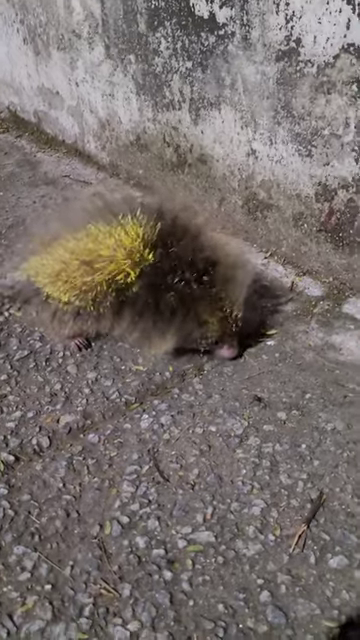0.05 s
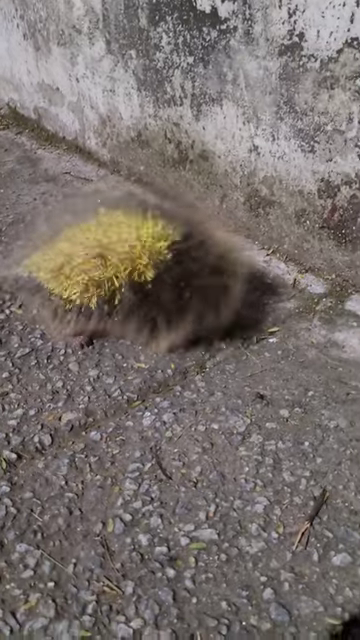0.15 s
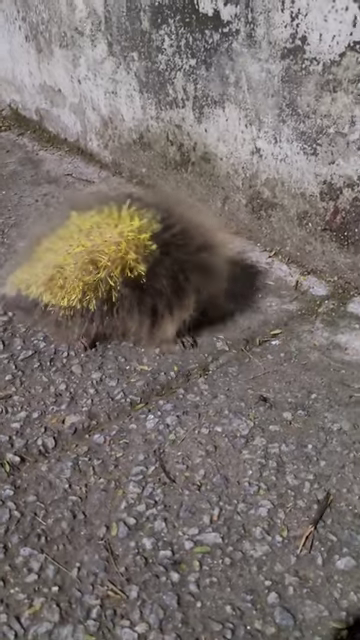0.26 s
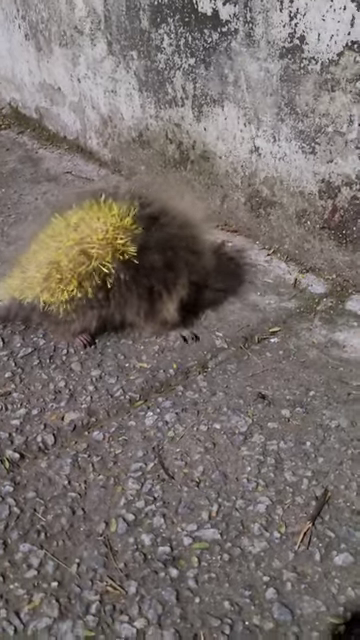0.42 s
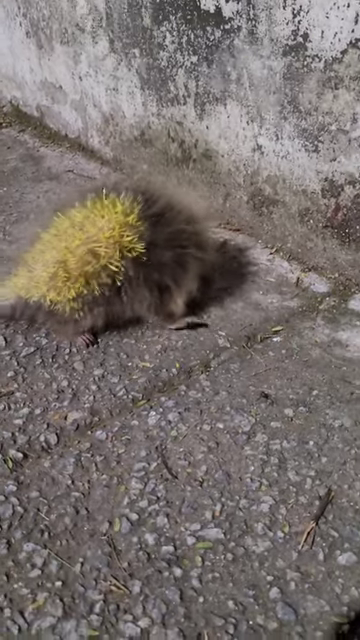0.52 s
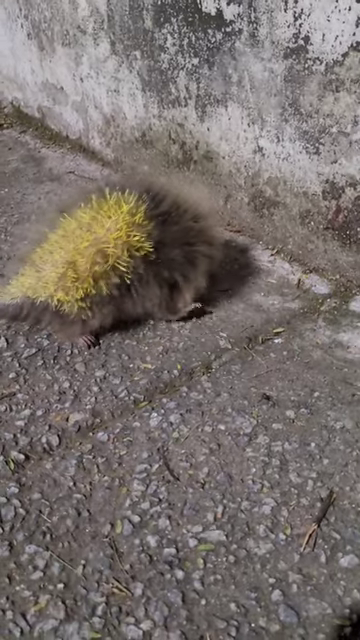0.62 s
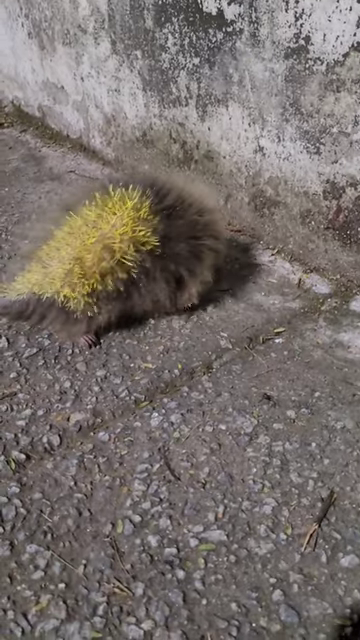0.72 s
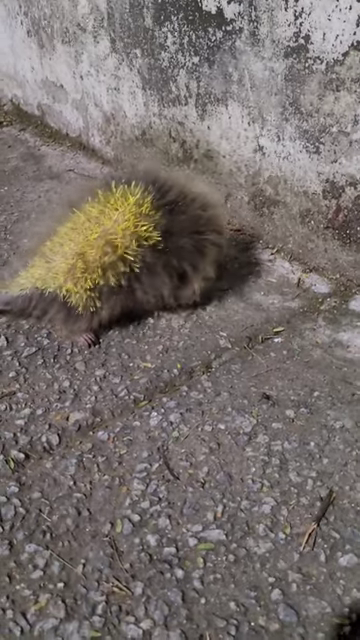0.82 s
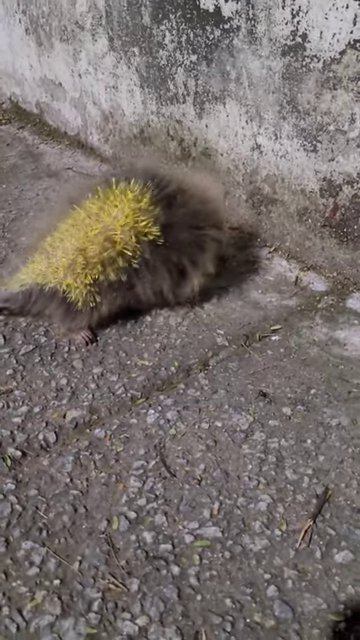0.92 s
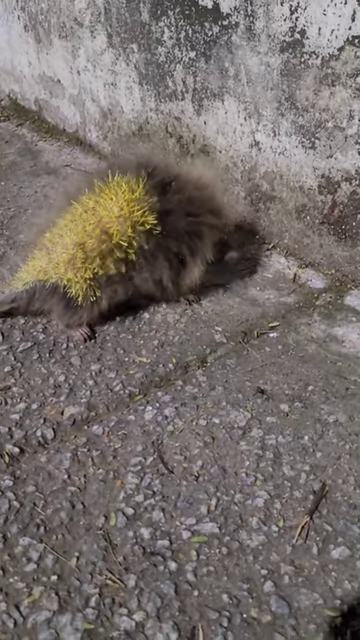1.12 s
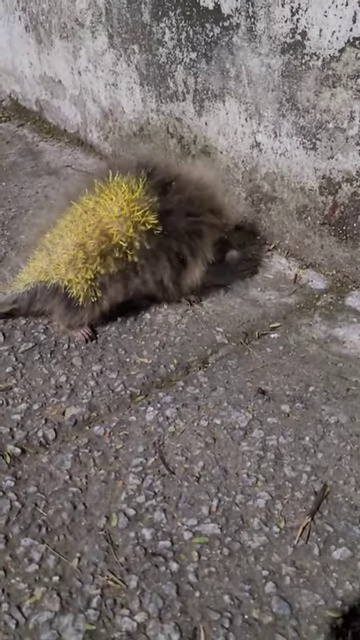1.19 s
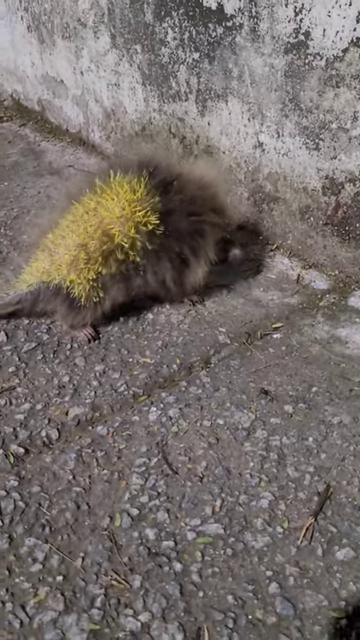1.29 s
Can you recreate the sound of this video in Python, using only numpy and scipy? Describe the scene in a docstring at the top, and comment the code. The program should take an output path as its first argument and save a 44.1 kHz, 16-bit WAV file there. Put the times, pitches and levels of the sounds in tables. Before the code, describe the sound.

Short, gritty scrape of a small porcupine's claws on pavement, over a faint low rumble.

```python
"""Soft brushing, then a loud scrape in two quick pushes: a small porcupine shuffles on gritty concrete.
Stick-slip friction of its claws makes the scrape, and grit snaps with sharp cracks that ring briefly.
The foot is close; a wall reflects its sound and the yard adds a short reverberation.
Light claw taps follow. Behind them are a far knock, a faint bird, the exhaust pulses of a distant
engine, a low hum and outdoor air."""
import sys
import numpy as np
from scipy import signal
from scipy.fft import rfft, irfft
from scipy.io import wavfile

SR = 44100
rng = np.random.default_rng(int(sys.argv[2]) if len(sys.argv) > 2 else 0)


def transcribe(signal):
    """Save signal, clipped to [-1, 1], as a 16-bit WAV file at the path in sys.argv[1]."""
    frames = np.atleast_2d(signal).T
    limited = np.clip(frames, -1, 1)
    pcm = np.round(limited * 32767).astype(np.int16)
    wavfile.write(sys.argv[1], SR, pcm)


N = 59535
TIME = np.arange(N) / SR


def amp(db):
    """Amplitude ratio of a level in decibels."""
    return 10 ** (np.asarray(db) / 20)

def unit(x):
    """Normalisation to unit rms."""
    return x / np.sqrt(np.mean(x ** 2) + 1e-20)

def read(points, hz):
    """Interpolation on a log-frequency axis."""
    f, value = np.transpose(points)
    return np.interp(np.log(hz + 1), np.log(f + 1), value)

def envelope(points):
    """Amplitude envelope, interpolated in decibels."""
    return amp(np.interp(TIME, *np.transpose(points)))

def fade(start, decay):
    """Exponential decay after an instant attack."""
    return (TIME >= start) * np.exp(-np.maximum(TIME - start, 0) / decay)

def lowpass(hz):
    """Second-order low-pass sections."""
    return signal.butter(2, hz, fs=SR, output="sos")

def colour(x, spectrum, size=4096):
    """Minimum-phase filtering at unit energy: only the shape of the spectrum counts."""
    log_gain = np.log(amp(read(spectrum, abs(np.fft.fftfreq(size, 1 / SR)))))
    taps = np.fft.ifft(np.exp(np.conj(signal.hilbert(log_gain)))).real[:size // 2]
    taps = np.reshape(taps / np.linalg.norm(taps), (1,) * (x.ndim - 1) + (-1,))
    return signal.fftconvolve(x, taps, axes=-1)[..., :N]

def reflect(x, response):
    """Convolution with an impulse response, normalised to unit energy on the left."""
    return signal.fftconvolve(x, response / np.linalg.norm(response[0]), axes=1)[:, :N]

def narrowband(hz, width):
    """Quadrature modulation gives two independent bands of noise."""
    a, b = signal.sosfilt(lowpass(width / 2), rng.standard_normal((2, 2, N)))
    return unit(a * np.cos(2 * np.pi * hz * TIME) + b * np.sin(2 * np.pi * hz * TIME))

def stereo(pair, coherence, left_lag_s=0):
    """Partial coherence: two independent signals mix into a left and a right channel."""
    hz = np.fft.rfftfreq(N, 1 / SR)
    shared = np.clip(read(coherence, hz), 0, 1)
    right, other = rfft(pair)
    left = (shared * right + np.sqrt(1 - shared ** 2) * other) * np.exp(-2j * np.pi * hz * left_lag_s)
    return irfft(np.array([left, right]), N)

# Left-right coherence of the close foot and of diffuse sound: f/Hz, coherence
CLOSE_COHERENCE = [(100,0.7),(600,0.93),(1500,1),(2200,.5),(2900,1),(3700,0.5),(5000,0.4),(15000,0)]
DIFFUSE_COHERENCE = [(40,0.75),(250,0.86),(600,0.76),(1300,0.31),(2500,0.071),(15000,.05)]

def close_source(pair):
    """A small delay: direct sound reaches the left channel slightly later."""
    return stereo(pair, CLOSE_COHERENCE, left_lag_s=0.00014)

def diffuse_noise():
    """A diffuse field of white noise, coherent mainly in the bass."""
    return stereo(rng.standard_normal((2, N)), DIFFUSE_COHERENCE)


# Strength of the two pushes: t/s, level/dB
PUSHES = [(.228,-75.5),(.235,-57.5),(.242,-41.5),(.246,-32.5),(.252,-37.5),(.256,-35),(.264,-32),(.271,-35),(.281,-28),(.286,-32),(.291,-26.5),(.300,-31),(.308,-41.5),(.317,-37),(.323,-27.5),(.330,-30.5),(.340,-46.5),(.354,-60.5)]
# Friction spectrum on each side: f/Hz, level/dB
FRICTION_LEFT = [(100,-26.5),(250,-15.5),(340,-6.5),(450,-2.5),(650,-14.5),(950,-9),(1380,0),(1750,-4),(2200,2.5),(2700,-1),(3300,1),(4400,2),(5500,-2),(6800,-1.5),(7700,1.5),(9000,-6),(10500,0),(13000,-2.5),(15500,-7.5)]
FRICTION_RIGHT = [(100,-31),(250,-12),(340,-3.5),(450,-2),(650,-12),(950,-9),(1380,2),(1750,-1.5),(2200,4.5),(2700,-1.5),(3300,-2.5),(4400,3),(5000,0),(6000,3.5),(6800,-2.5),(7900,2),(9000,0.5),(12500,3),(15500,-4.5)]

def scrape(grains_per_s=4000, grain_spread_db=3.5, smooth_share=0.55, thinning_db_per_s=75):
    """Stick-slip friction: claws drag over grit in dense micro-slips, and the low part thins."""
    struck = rng.random(N) < grains_per_s / SR
    grains = struck * amp(grain_spread_db * np.minimum(rng.exponential(1, N), 3))
    slips = np.sqrt(smooth_share + (1 - smooth_share) * unit(grains) ** 2)
    force = amp(np.interp(TIME, *np.transpose(PUSHES), left=-np.inf, right=-np.inf) - 1)
    friction = rng.standard_normal((2, N))
    bursts, cracks = grit_snaps()
    drive = close_source(friction * np.hypot(force * slips, bursts) + cracks)
    drive = drive + wall_reflection(drive)
    low = signal.sosfiltfilt(lowpass(3950), drive)
    low_db = np.clip(thinning_db_per_s * (0.31 - TIME), -4, 5)
    drive = drive + low * (amp(low_db) - 1)
    left = amp(-1) * colour(drive[0], FRICTION_LEFT)
    right = amp(1.45) * colour(drive[1], FRICTION_RIGHT)
    return np.array([left, right]) + force * grip_resonances()

# Grit snapping under the claws: t/s, level/dB, decay/s, ring f/Hz
GRIT_SNAPS = [(0.244,-33.5,.0015,1676),(0.2504,-30.5,0.0015,1705),(0.259,-30,0.00091,2270),(0.2645,-30,0.0011,1500),(0.2741,-25.5,0.00081,2180),(0.2763,-30,0.00078,2110),(0.2801,-24,0.00088,2304),(.2875,-27.5,.0011,4863),(0.2924,-25.5,0.00082,5990),(0.2979,-18.5,.0009,10340),(0.2993,-23.5,.0007,1953),(0.3202,-25,.0008,7740),(0.3219,-27,.0008,1989),(.3250,-24,0.00053,7800),(0.3287,-27.5,0.00054,4388),(0.33,-24.5,.0007,7770),(0.3356,-35,.0015,4423)]

def grit_snaps(crack_db=5.5, ring_db=-12, ring_decay_s=0.0024):
    """Impulse excitation: snaps give an envelope of noise bursts, and cracks whose grains ring on."""
    bursts, cracks = np.zeros(N), np.zeros((2, N))
    for (start, db, decay, hz), phase in zip(GRIT_SNAPS, rng.random((len(GRIT_SNAPS), 2, 1))):
        bursts += amp(db) * fade(start, decay)
        cracks[:, round(start * SR)] += amp(db + crack_db) * np.sign(phase[:, 0] - .5)
        ring = np.sin(2 * np.pi * (hz * TIME + phase))
        cracks += amp(db + ring_db) * fade(start, ring_decay_s) * ring
    return bursts, cracks

# Claw and grit resonances: t/s, length/s, f/Hz, bandwidth/Hz, level/dB re the push, left-right/dB
GRIP_MODES = [(.24,.07,460.8,60.35,-15.5,-2),(0.237,0.036,1640,262,-8.5,-7.5),(0.241,.034,3250,160,-9,10.5),(.272,0.037,1370,129.7,-11,-3),(0.273,0.037,2200,201.9,-10,4),(0.273,.034,4700,900,-7.5,0),(0.31,.028,980,260,-11.5,-3),(0.31,.028,4380,201.4,-10,-2.5),(0.314,0.031,7750,300,-8,-3.5)]

def grip_resonances(ramp_s=.004):
    """Forced resonance: narrow bands sound for as long as a claw keeps its grip."""
    out = 0
    for start, length, hz, width, db, pan_db in GRIP_MODES:
        held = np.clip(np.minimum(TIME - start, start + length - TIME) / ramp_s, 0, 1)
        gain = amp(db + np.array([[.5], [-.5]]) * pan_db)
        out = out + held * gain * close_source(narrowband(hz, width))
    return out

def wall_reflection(x):
    """Early reflections from ground and wall smear the sound over a few milliseconds."""
    return amp(-12) * reflect(x, diffuse_noise() * fade(start=0.0021, decay=0.0071))

# Reverberation time of the yard: f/Hz, T60/s
REVERB_TIME = [(200,0.37),(1500,.45),(4000,0.38),(8000,.38),(15000,0.42)]
# Spectrum of its tail: f/Hz, level/dB
TAIL_SPECTRUM = [(300, 1.5), (900, 4.5), (2000, 1.5), (4000, 2), (7500, 3), (9500, -3), (15000, -1)]

def yard_reverberation(x):
    """Reverberation: a weak diffuse tail decays exponentially in each band."""
    hz, t, bands = signal.stft(rng.standard_normal((2, N)), SR, nperseg=256)
    decay = amp(-60 * t / read(REVERB_TIME, hz)[:, None])
    tail = signal.istft(bands * decay, SR, nperseg=256)[1][:, :N]
    return amp(-26) * reflect(x, colour(tail, TAIL_SPECTRUM))

# Brushing of fur and feet: t/s, length/s, level/dB
BRUSH_STROKES = [(.01,.24,-65),(0.592,0.1,-81)]
# The foot setting down before it pushes, and later claw taps: t/s, level/dB, decay/s
FOOTFALLS = [(.1958,-52,0.006),(.2135,-56.5,0.0079),(.2205,-48.5,0.0049)]
CLAW_TAPS = [(.614,-68.5,0.012),(.655,-75.5,0.033)]
# Their spectra: f/Hz, level/dB
BRUSH_SPECTRUM = [(300,4),(900,0.5),(1500,3),(2200,3),(3300,-15.5),(4500,-9.5),(6500,-5.5),(9000,-12.5),(15000,-19.5)]
FOOTFALL_SPECTRUM = [(200,-16.5),(450,4),(750,-4.5),(1300,5.5),(2300,1),(3200,-4),(4500,-6),(6500,-9),(7800,-3.5),(9500,-7.5),(15500,-7.5)]
TAP_SPECTRUM = [(500,-28.5),(3000,-6),(4500,-6.5),(5800,4.5),(6800,-3),(7700,-2),(9000,-19),(15000,-33)]

def shuffle():
    """Light friction gives smooth swells of noise; light impacts give damped bursts."""
    swells = sum(amp(db) * np.sin(np.pi * np.clip((TIME - start) / length, 0, 1)) ** 2
                 for start, length, db in BRUSH_STROKES)
    footfalls = sum(amp(db) * fade(start, decay) for start, db, decay in FOOTFALLS)
    taps = sum(amp(db) * fade(start, decay) for start, db, decay in CLAW_TAPS)
    contact = close_source(rng.standard_normal((2, N))) * amp([[-1.5], [1.5]])
    return (colour(diffuse_noise() * swells, BRUSH_SPECTRUM)
            + colour(contact * footfalls, FOOTFALL_SPECTRUM)
            + colour(diffuse_noise() * taps, TAP_SPECTRUM))

# Echo of the knock: f/Hz, level/dB
KNOCK_SPECTRUM = [(400,-33),(1200,-2),(1700,2),(2200,0.5),(3200,-9.5),(4200,3),(6000,0.5),(8000,1),(11000,-1),(13000,-4),(14200,-1),(15500,-13)]
# Modes of the struck object: f/Hz, level/dB, T60/s
STRUCK_MODES = [(1496,-2.5,0.4),(1620,-16,0.27),(1858,-4.5,0.51),(1898,-6,0.39),(3970,-8,0.37),(4210,-6,0.25)]

def far_knock(start_s=.8895, rise_s=0.003, echo_t60_s=0.36):
    """A distant impact arrives mostly as reverberation, with a little modal ringing."""
    t = np.maximum(TIME - start_s, 0)
    ring = sum(amp(db - 60 * t / t60) * np.sin(2 * np.pi * (hz * t + rng.random((2, 1))))
               for hz, db, t60 in STRUCK_MODES)
    echo = colour(diffuse_noise(), KNOCK_SPECTRUM) * amp(-63 - 60 * t / echo_t60_s)
    return np.minimum(t / rise_s, 1) * (echo + amp(-69.5) * ring)

# Bird notes: centre t/s, level/dB
BIRD_PIPS = [(.684,-77),(.728,-78),(.772,-80.5),(.822,-71.5),(.845,-81.5),(.875,-74.5),(.967,-78),(1.017,-80)]

def bird(pip_s=0.025, lower_hz=2280, upper_hz=3100, roughness=0.59):
    """Random amplitude modulation roughens a quick run of faint two-tone pips."""
    pips = sum(amp(db) * np.cos(np.pi * np.clip((TIME - centre) / pip_s, -.5, .5)) ** 2
               for centre, db in BIRD_PIPS)
    rasp = unit(signal.sosfilt(lowpass(180), rng.standard_normal((2, N))))
    tones = np.sin(2 * np.pi * lower_hz * TIME) + amp(-18) * np.sin(2 * np.pi * upper_hz * TIME)
    return pips * unit((1 - roughness + roughness * rasp) * tones)

# The engine slowly coming nearer: t/s, level/dB
ENGINE_LEVEL = [(0,-63.5),(.16,-66),(.3,-60.5),(.455,-68.5),(.48,-59),(.62,-59.5),(.8,-56.5),(1.1,-54),(1.35,-53)]
# Its exhaust: f/Hz, level/dB
EXHAUST_SPECTRUM = [(40,-20.5),(80,-1),(105,6),(130,-3.5),(160,-2),(190,-7),(230,-3),(280,-12.5),(350,-20),(450,-26.5),(700,-36),(1500,-62)]

def engine(firing_hz=20.614, firing_at_s=1.006, spread_db=0.5, decay_s=.022, left_lag_s=0.000076):
    """A pulse train: each firing of a distant single cylinder gives a dull puff and its echoes."""
    firings = np.diff(np.floor((TIME - firing_at_s) * firing_hz), prepend=0) > 0
    pulses = firings * amp(spread_db * rng.standard_normal(N))
    decay = fade(0, decay_s)
    echoes = signal.fftconvolve(pulses, rng.standard_normal(N) * decay)[:N]
    turbulence = signal.fftconvolve(pulses, decay)[:N] * rng.standard_normal(N)
    drive = amp(-5) * unit(pulses) + amp(-1) * unit(echoes) + amp(-5) * unit(turbulence)
    sound = unit(colour(drive, EXHAUST_SPECTRUM)) * envelope(ENGINE_LEVEL)
    return np.array([np.interp(TIME - left_lag_s, TIME, sound), sound])

# The faint higher drone, an overtone of the distant engine: t/s, level/dB
DRONE_LEVEL = [(0,-65.5),(.15,-70),(.47,-73),(.55,-62.5),(.62,-71.5),(.75,-67.5),(.95,-79)]

def hum(low_hz=49.9, right_phase_rad=0.28, drone_hz=244.2):
    """A steady low hum, and a higher engine overtone that wavers by beating with narrowband noise."""
    low = unit(np.sin(2 * np.pi * low_hz * TIME + np.array([[0], [right_phase_rad]])))
    drone = unit(np.sin(2 * np.pi * drone_hz * TIME) + 0.35 * narrowband(drone_hz, width=20)[0])
    return amp(-50) * low + drone * envelope(DRONE_LEVEL)

# Outdoor rumble and treble hiss: f/Hz, level/dB
RUMBLE_SPECTRUM = [(20,-8),(60,5),(120,4),(180,-8),(250,-4.5),(330,-8),(500,-16),(800,-28.5),(1300,-29.5),(1900,-35),(3500,-38.5),(5000,-40),(6800,-33.5),(9000,-41),(12000,-41),(15500,-39.5)]
HISS_SPECTRUM = [(2000,-27),(5000,-10.5),(7000,0),(9000,-3),(12000,6.5),(15500,-1)]
# Growth of the hiss: t/s, level/dB
HISS_LEVEL = [(0,-92.5),(.8,-93),(1.05,-84),(1.35,-83.5)]

def outdoor_air(dip_at_s=0.457, dip_width_s=.025, dip_db=-2):
    """Diffuse ambient noise: a rumble that dips briefly and a faint hiss that grows late."""
    hiss = colour(diffuse_noise(), HISS_SPECTRUM) * envelope(HISS_LEVEL)
    dip = np.exp(-((TIME - dip_at_s) / dip_width_s) ** 2)
    rumble = amp(-59 + dip_db * dip) * unit(colour(diffuse_noise(), RUMBLE_SPECTRUM))
    return rumble + hiss


def scene():
    """Superposition of the close animal and the yard around it."""
    foot = scrape()
    porcupine = foot + yard_reverberation(foot) + shuffle()
    distant = far_knock() + bird()
    background = (engine() + hum() + outdoor_air()) * amp([[-.5], [.5]])
    return porcupine + distant + background

def record(dry, fade_out_s=.004, cutoff_hz=15500):
    """A short fade-out, then band limiting by a linear-phase low-pass."""
    dry = dry * np.sin(np.pi / 2 * np.minimum((TIME[-1] - TIME) / fade_out_s, 1)) ** 2
    padded = np.pad(dry, ((0, 0), (255, 255)), "reflect", reflect_type="odd")
    taps = signal.firwin(511, cutoff_hz, window=("kaiser", 9), fs=SR)
    return signal.oaconvolve(padded, taps[None], "valid")


dry = scene()
out = record(dry)
transcribe(out)
```